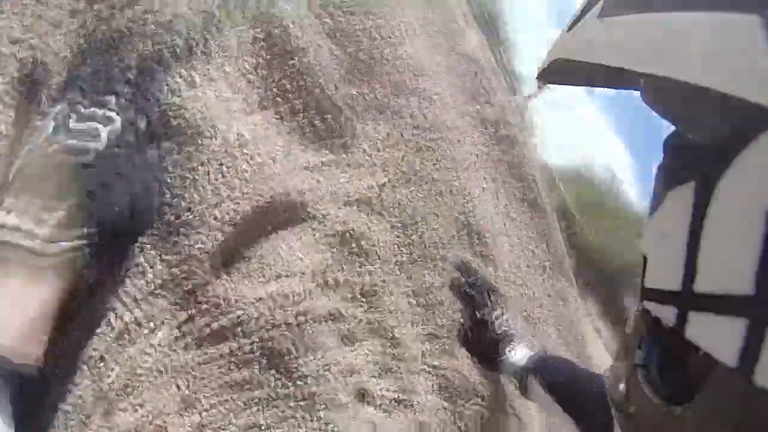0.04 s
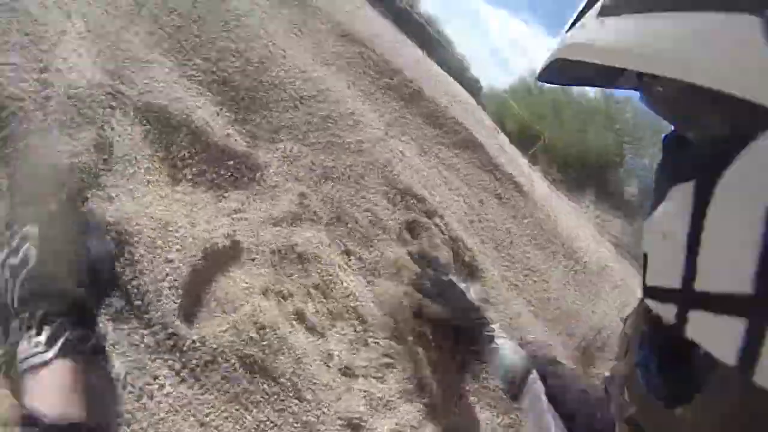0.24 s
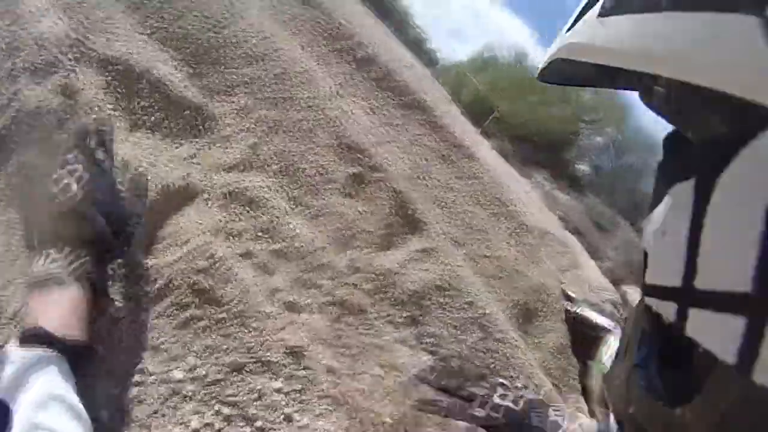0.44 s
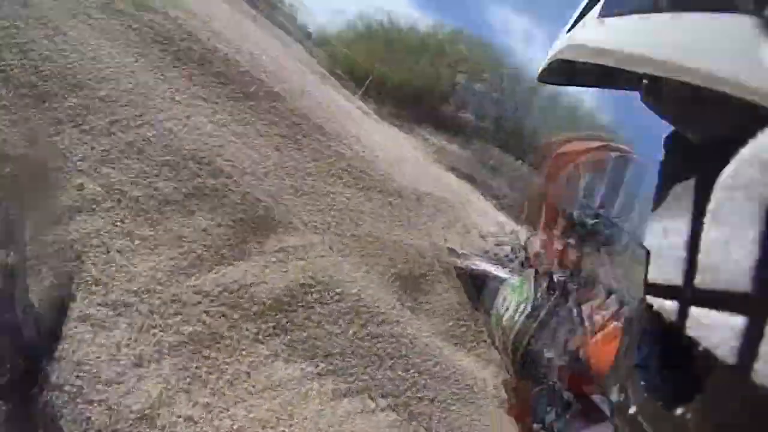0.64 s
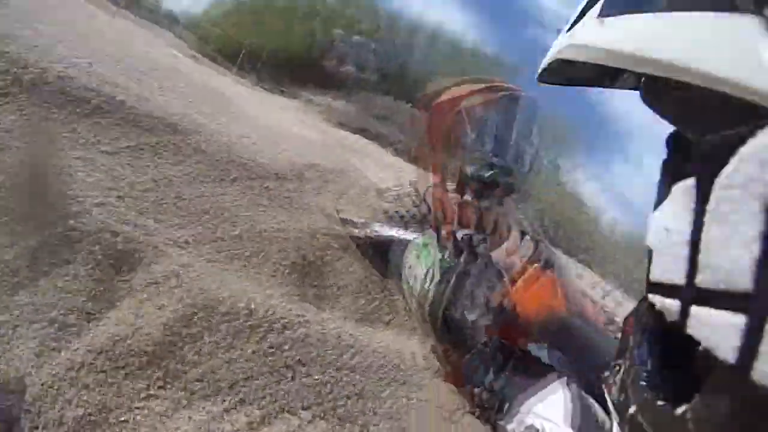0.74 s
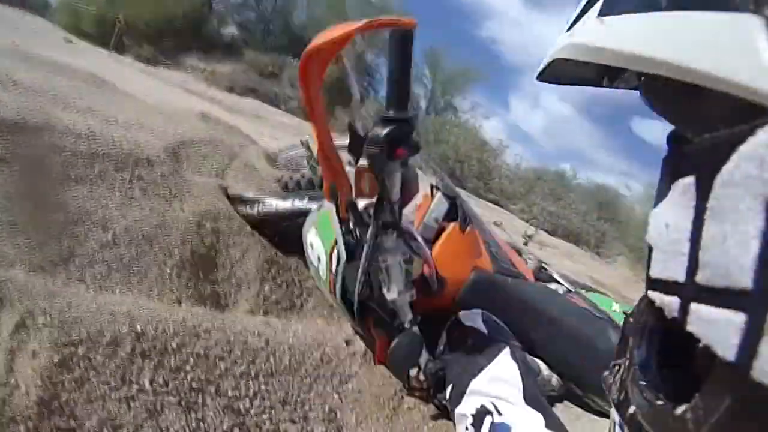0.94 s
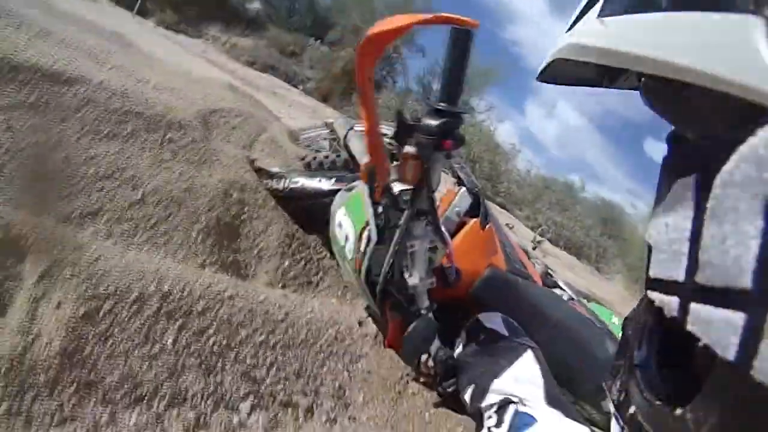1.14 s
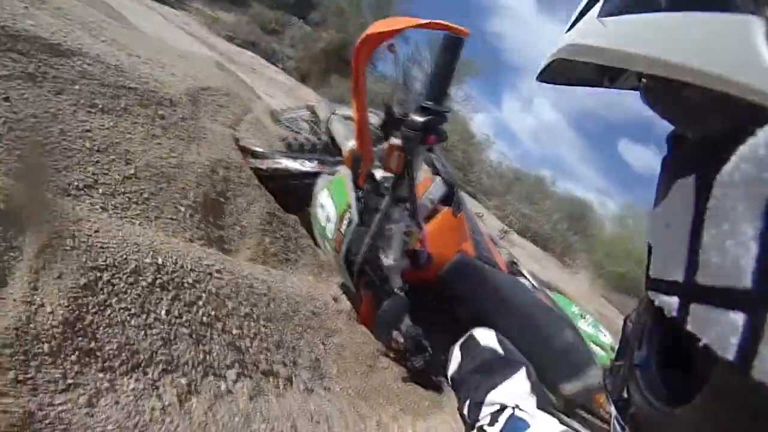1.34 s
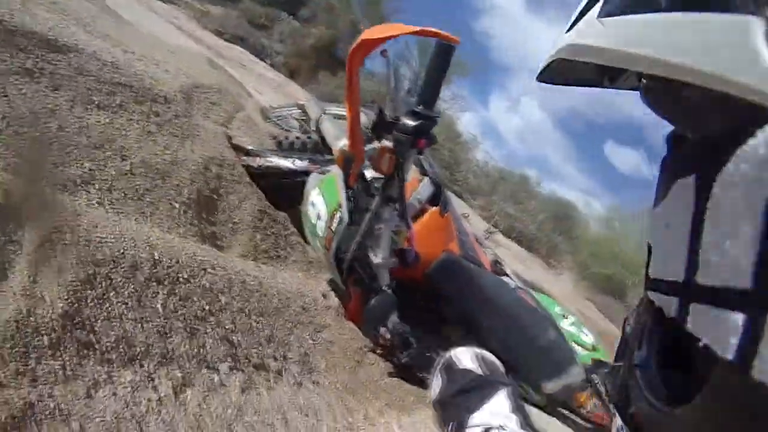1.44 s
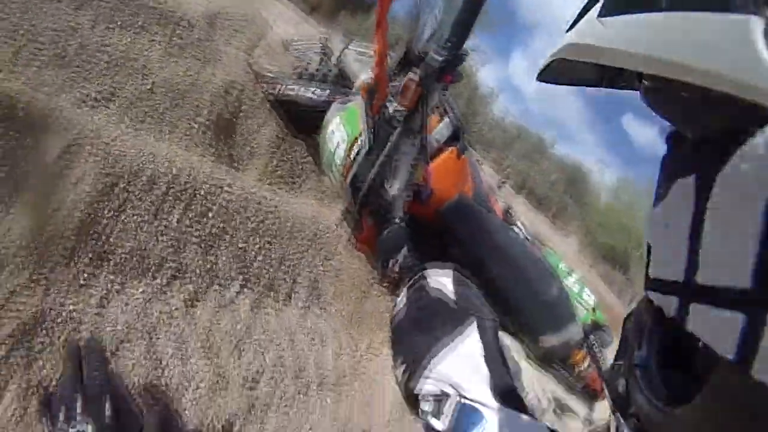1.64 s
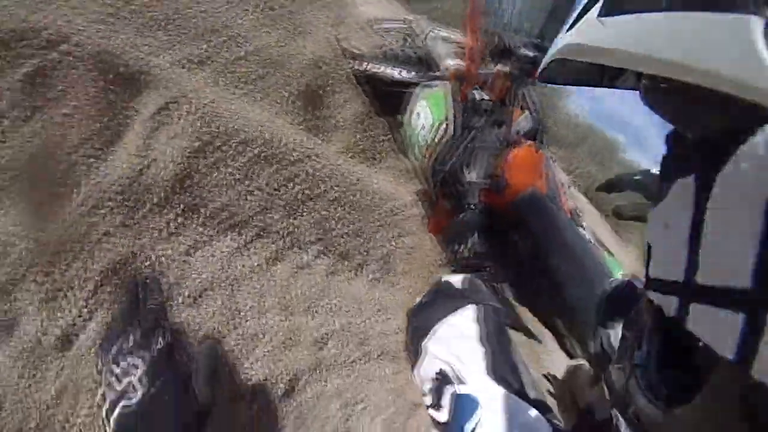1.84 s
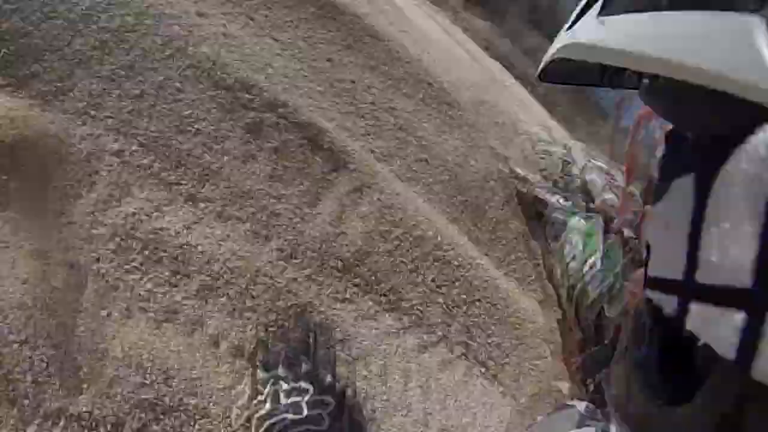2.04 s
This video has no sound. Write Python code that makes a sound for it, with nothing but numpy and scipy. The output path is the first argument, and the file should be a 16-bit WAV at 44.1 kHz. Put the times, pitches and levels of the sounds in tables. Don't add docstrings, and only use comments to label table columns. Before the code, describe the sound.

Deep handling thumps on a helmet camera outdoors, close and muffled. Grit and plastic chatter from the start; strong wobbling jolts and hollow knocks cluster at 0.2-0.35 s, a lighter knock at 0.47, then a hard booming blow at 0.68. Rumbling fades, with a softer thud at 0.98. Faint hiss, thin whine and tiny ticks continue, sharper clicks at 1.1 and 1.75, a tiny squeak at 1.92, and a final knock at 2.07.

```python
import sys
import numpy as np
from scipy import signal
from scipy.fft import rfft, irfft
from scipy.io import wavfile
from scipy.ndimage import uniform_filter1d

SR = 44100
rng = np.random.default_rng(int(sys.argv[2]) if len(sys.argv) > 2 else 0)


def boost(x):
    u = np.asarray(x, float) / 20
    return 10 ** u


def to_wav(sig):
    pcm = np.clip(np.atleast_2d(sig), -1, 1) * 32767
    pcm = np.round(pcm).astype(np.int16)
    wavfile.write(sys.argv[1], SR, pcm.T)


N = 92610
T = np.arange(N) / SR


def unit(x):
    return x / np.sqrt(np.mean(x ** 2))


def spike(start_s):
    return np.bincount([int(start_s * SR)], minlength=N) * 1.0


def noise():
    return rng.standard_normal(N)


def walk(rate_hz):
    k = int(SR / rate_hz)
    return unit(uniform_filter1d(uniform_filter1d(noise(), k), k))


def curve(table):
    return boost(np.interp(T, *np.array(table).T))


def lowpass(x, order, hz):
    return signal.sosfilt(signal.butter(order, hz, fs=SR, output="sos"), x)


def band(x, hz, width_hz):
    return signal.lfilter(*signal.iirpeak(min(hz, 0.44 * SR), hz / width_hz, fs=SR), x)


def ring(x, hz, t60_s):
    decay = np.log(1000) / (t60_s * SR)
    return signal.lfilter([1], [1, -np.exp(2j * np.pi * hz / SR - decay)], x).imag


def swell(x, hz, t60_s):
    decay = np.log(1000) / (t60_s * SR)
    pole = np.exp(2j * np.pi * hz / SR - decay)
    first = signal.lfilter([1], [1, -pole], x.astype(complex))
    return signal.lfilter([1], [1, -pole], first).imag * decay * np.e


# pitch_hz, density_db (per Hz)
FLOOR_SPECTRUM = [(120, -4), (200, -8), (660, -5), (1110, -12), (1630, -4), (2060, -13.5), (2510, -10.5),
                  (5770, -21.5), (15000, -32.5)]


def floor():
    hz, db = np.array(FLOOR_SPECTRUM).T
    f = np.fft.rfftfreq(N, 1 / SR)
    colour = boost(np.interp(np.log(f + 1), np.log(hz), db, left=-40))
    return boost(-58 + 1.8 * walk(19)) * unit(irfft(rfft(noise()) * colour, N))


# time_s, level_db
BIKE_LEVEL = [
    (0, -61.5),
    (.5, -69),
    (.68, -64.5),
    (.8, -61),
    (1.0, -58),
    (1.2, -60.5),
    (1.5, -61),
    (1.75, -60.5),
    (1.95, -65),
    (2.1, -69),
]
# pitch_hz, width_hz, level_db
HISS_BANDS = [(1500, 79, -12.5), (1715, 256, -1), (2400, 720, -10), (3110, 430, -6.5), (3585, 280, -5),
              (4444, 180, -10.5), (4800, 140, -12.5), (5760, 820, -7), (7000, 350, -15.5)]
# pitch_hz, level_db
WHINE = [(2335, -68.5), (3503, -65.5)]


def hiss():
    bands, lines = 0, 0
    for hz, width_hz, db in HISS_BANDS:
        wide_hz = 1.4 * width_hz
        coloured = unit(band(band(noise(), hz, wide_hz), hz, wide_hz))
        bands = bands + boost(db + 1.8 * walk(25)) * coloured
    for hz, db in WHINE:
        lines = lines + boost(db + 2 * walk(3.4)) * np.sin(2 * np.pi * hz * T + 0.56 * walk(5.6))
    gain = curve(BIKE_LEVEL)
    return bands * gain + lines * gain / gain.max()


# time_s, level_db
EFFORT = [(0.0, -37), (0.17, -37), (0.34, -36.5), (.52, -33), (0.64, -35.5), (.75, -30), (0.84, -32.5),
          (.92, -39.5), (1.04, -34.5), (1.16, -41.5), (1.3, -40), (1.42, -42), (1.52, -47), (1.61, -45.5),
          (1.69, -39.5), (1.85, -44.5), (1.95, -41.5), (2.04, -51.5)]
# pitch_hz, level_db, t60_s
MOUNT_MODES = [(29, -16, 0.056), (37.86, -2.5, 0.36), (75.6, -18.5, 0.02), (99, -12.5, 0.076),
               (145, -22, 0.064), (215, -28.5, 0.043), (359, -26.5, 0.01), (692, -34.5, 0.022)]


def tremble():
    out = 0
    for hz, db, t60_s in MOUNT_MODES:
        moving = unit(ring(ring(noise(), hz, t60_s), hz, 0.37 * t60_s))
        out = out + boost(db + 1.7 * walk(17)) * moving
    return out * curve(EFFORT)


# start_s, length_s, pitch_hz, level_db
SQUEAK = [
    (1.910, 0.012, 12380, -44),
    (1.924, 0.014, 12450, -44),
]


def squeak():
    out = 0
    for s, length_s, hz, db in SQUEAK:
        slip = np.sin(np.pi * np.clip((T - s) / length_s, 0, 1) ** 0.94)
        out = out + boost(db) * np.sin(2 * np.pi * hz * T) * slip
    return out


def grit():
    return noise() * boost(2.5 * rng.exponential(size=N) + 3 * walk(400))


def burst(grains, start_s, db, hz, width_hz, length_s, broad_db):
    u = np.clip((T - start_s) / length_s, 0, 5)
    on = (u > 0) & (u < 5)
    puff = (grains * np.minimum(u * 8, 1) * np.exp(-u ** 3))[on]

    def scale(v):
        return v * np.sqrt(length_s * SR / np.sum(v ** 2))

    narrow = scale(band(band(puff, hz, width_hz), hz, 2 * width_hz))
    broad = scale(band(puff, 9200, 8000))
    out = np.zeros(N)
    out[on] = boost(db) * (narrow + boost(broad_db) * broad)
    return out


# start_s, level_db
TICKS = [(0.541, -68), (0.605, -62), (0.677, -72), (0.701, -63), (0.763, -60.5), (0.8377, -63),
         (0.901, -60), (0.9983, -60), (1.0796, -60), (1.1086, -71), (1.2028, -64), (1.304, -60),
         (1.334, -61), (1.3969, -59), (1.4448, -70), (1.48, -62), (1.605, -59), (1.6786, -60),
         (1.7536, -83), (1.8399, -63), (1.8823, -77), (1.9317, -72), (1.9536, -100), (1.9851, -62)]


def ticks():
    grains = grit()
    return sum(burst(grains, s, db - 9, 9200, 780, 0.00274, -11) for s, db in TICKS)


# start_s, level_db, pitch_hz, width_hz, length_s
RATTLES = [(.000, -57.5, 2400, 2750, 0.033), (0.103, -55.5, 3000, 1200, 0.013),
           (.107, -53, 1620, 348, 0.0052), (.116, -63.5, 1660, 500, 0.018),
           (.149, -61.5, 1600, 400, 0.0058), (0.127, -56.5, 3000, 3000, 0.016),
           (0.177, -56, 2180, 3000, 0.098), (0.192, -63, 3530, 2500, 0.0023),
           (0.21, -50.5, 5570, 2440, 0.005), (0.214, -50.5, 5260, 2400, 0.0098),
           (0.245, -65, 5040, 4000, 0.0033), (0.251, -57.5, 1790, 1205, .02),
           (0.258, -60.5, 4800, 3000, 0.0033), (0.265, -52, 5000, 2500, 0.0056),
           (0.282, -51.5, 1870, 1200, 0.0038), (.288, -54, 2000, 1600, 0.015),
           (0.302, -60.5, 1560, 706, .08), (0.293, -62, 5860, 1000, 0.018),
           (0.3322, -58.5, 9450, 4030, 0.0026), (0.336, -56.5, 5160, 6140, 0.023),
           (0.3673, -46.5, 4170, 3230, 0.004), (0.373, -52.5, 3540, 3000, 0.0049),
           (0.381, -50, 5540, 2430, 0.0045), (0.385, -52, 1590, 239, 0.0078),
           (.413, -55, 5860, 2000, 0.004), (0.435, -57, 4560, 3500, .005),
           (0.468, -54.5, 2500, 400, 0.0027), (.4906, -58, 7500, 5900, 0.0015),
           (0.491, -60.5, 1500, 505, 0.044), (0.677, -49.5, 4320, 710, 0.0027),
           (0.878, -67, 4850, 3000, 0.0073), (0.903, -62.5, 2400, 500, 0.0078),
           (1.109, -45, 5600, 5200, 0.004), (1.534, -60.5, 1850, 400, 0.0098),
           (1.606, -50, 2220, 1800, 0.0029), (1.755, -46, 3670, 198, 0.0057),
           (1.881, -66, 7800, 3800, 0.011), (1.930, -64, 14300, 2000, 0.0036),
           (1.9531, -50.5, 5370, 7000, 0.0061)]
# pitch_hz, width_hz, level_db
PORTS = [(1620, 400, 6), (2450, 400, 3), (5800, 900, 2), (9600, 1200, -6)]


def rattles():
    grains, chatter = grit(), 0
    for s, db, hz, width_hz, length_s in RATTLES:
        broad_db = -10 + 20 * np.log10(hz / 5000)
        chatter = chatter + burst(grains, s, db, hz, width_hz, length_s, broad_db)
    wall = lowpass(chatter, 4, 7980)
    ports = sum(boost(db) * band(chatter, hz, width_hz) for hz, width_hz, db in PORTS)
    return wall + boost(-5.5) * (chatter - wall) + ports


# start_s, level_db, pitch_hz, fade_cycles, first swing (out +1, in -1)
THUDS = [(0.1961, -25, 480, 3.2, 1), (0.3239, -11.5, 103, 6, 1), (0.3358, -8.5, 71, 1.3, -1),
         (0.4672, -31.5, 410, 4.6, 1), (.6774, -24, 1756, 31, -1), (0.678, -15.5, 509, 6.9, -1),
         (.6810, -8.5, 117, 4.5, 1), (.6805, -27.5, 390, 7.5, 1), (.6830, -26.5, 672, 40, 1),
         (.6848, -8, 117.7, 2.8, -1), (0.9799, -23, 72, 6.1, -1), (1.1961, -28.5, 110, 5.9, 1),
         (2.0713, -18, 150, 4.6, 1), (2.0718, -27.5, 604, 4.7, 1), (2.0724, -33.5, 1500, 30, 1),
         (2.0724, -23.5, 274, 9.6, 1), (2.0770, -33, 680, 31, 1), (2.0775, -30, 277, 5.4, 1),
         (2.0782, -17.5, 118, 5.6, 1)]


def thuds():
    out = 0
    for s, db, hz, cycles, way in THUDS:
        swing = np.sign(way) * boost(db) * ring(spike(s), hz, cycles / hz)
        out = out + lowpass(swing, 2, 6.4 * hz)
    return out


# pitch_hz, level_db, t60_s
HOUSING = [(175, -10.5, 0.14), (258, -15, 0.096), (303, -17, 0.0092), (400, -11.5, 0.015),
           (517, -2.5, 0.013), (659.6, -8, 0.059), (850, -4, 0.015), (1417, -7.5, 0.04),
           (1650, -20.5, 0.07), (2300, -11.5, .025), (3000, -8.5, 0.017), (4640, -11, 0.034)]
# start_s, level_db, contact_s, dull_above_hz
KNOCKS = [(.002, -38, 0.0054, 900), (.03, -41.5, 0.022, 397), (.091, -47, 0.014, 960),
          (.194, -27.5, 0.019, 1430), (.254, -32.5, 0.003, 890), (.284, -35.5, 0.006, 1000),
          (.293, -39, 0.0065, 900), (.302, -40, 0.011, 910), (.322, -34, 0.009, 1340),
          (.467, -34, 0.0064, 2530), (.474, -35, 0.03, 560), (.492, -41, 0.024, 560),
          (.572, -46, 0.0026, 710), (.623, -44, .006, 595), (.678, -26, 0.006, 3450),
          (.683, -26, 0.011, 926), (.740, -32.5, 0.14, 510), (.830, -34, 0.084, 520),
          (.875, -36, 0.056, 710), (.979, -37, 0.016, 246), (1.194, -46.5, 0.012, 244),
          (2.0715, -30, 0.012, 1310)]


def knocks():
    out = np.zeros(N)
    for s, knock_db, contact_s, dull_hz in KNOCKS:
        i = int(s * SR)
        size = min(8192, N - i)
        blow = spike(0)[:size]
        contact = rng.standard_normal(size) * np.exp(-2 * T[:size] / contact_s)
        body = 0
        for mode_hz, mode_db, t60_s in HOUSING:
            hz = mode_hz * (1 + 0.03 * rng.standard_normal())
            db = knock_db + mode_db + 2 * rng.standard_normal()
            clean = ring(blow, hz, t60_s)
            at_once = hz < 320 and contact_s < 0.02
            rung = clean if at_once else ring(contact, hz, t60_s)
            same_energy = np.sqrt(np.sum(clean ** 2) / np.sum(rung ** 2))
            body = body + boost(db) * rung * same_energy
        out[i:i + size] += lowpass(body, 3, dull_hz)
    return out


# start_s, wobble_db, boom_db, boom_hz
SHAKES = [(.000, -30, -53.5, 142), (0.084, -49, -40, 130), (0.1717, -24.5, -31.5, 105),
          (0.195, -5.5, -25, 142), (0.242, -15.5, -13.5, 72.8), (0.27, -13, -19, 99.4),
          (0.323, -11, -15, 116.4), (0.368, -28.5, -24.5, 102.3), (0.470, -29.5, -36.5, 104.7),
          (0.494, -29.5, -61, 101), (0.569, -39, -30.5, 95.5), (0.621, -46, -34, 145),
          (0.6936, -50.5, -10, 107), (0.7225, -47.5, -18.5, 100.2), (0.7508, -42, -29.5, 102),
          (0.78, -45, -38.5, 133), (.850, -63, -33, 123.2), (.905, -60, -43, 125),
          (0.987, -30.5, -32, 95.7), (1.195, -66, -38.5, 107.4), (1.2041, -32, -62, 111),
          (1.297, -30, -47, 76.6), (1.419, -66, -45, 142), (1.759, -57, -48.5, 96.5),
          (1.939, -65, -49, 145), (1.871, -44, -40, 103), (2.069, -66, -28.5, 120.3)]


def jolts():
    pushes, booms = 0, 0
    for s, wobble_db, boom_db, boom_hz in SHAKES:
        pushes = pushes + boost(wobble_db) * spike(s)
        booms = booms + boost(boom_db) * swell(spike(s), boom_hz, 10.4 / boom_hz)
    return swell(pushes, 40.53, 0.12) + booms


def scene():
    background = floor() + hiss() + tremble()
    parts = squeak() + ticks() + rattles()
    return (background + parts + thuds() + knocks() + jolts())[None]


def roll_off(x):
    return signal.sosfilt(signal.butter(12, 15200, fs=SR, output="sos"), x)


def record(dry):
    low = signal.sosfilt(signal.ellip(8, 0.2, 60, 15150, fs=SR, output="sos"), dry)
    mix = signal.sosfilt(signal.butter(2, 18, "high", fs=SR, output="sos"), low)
    return roll_off(mix)


dry = scene()
out = record(dry)
to_wav(out)
```